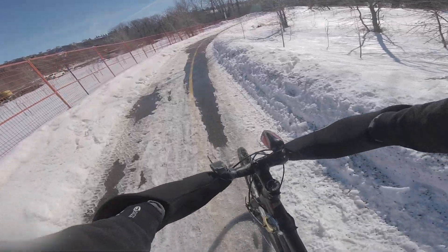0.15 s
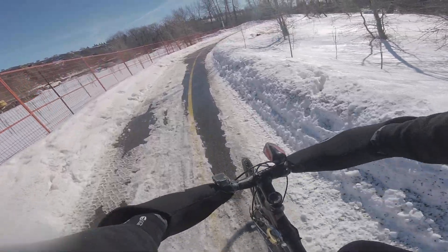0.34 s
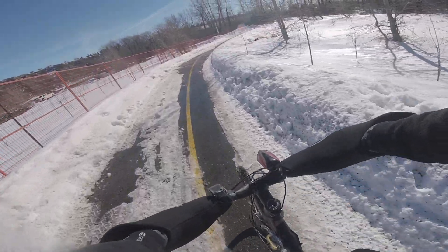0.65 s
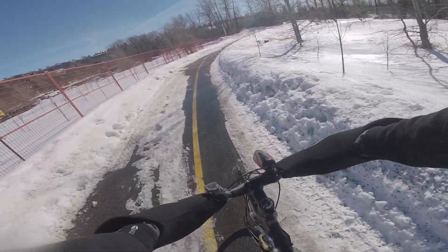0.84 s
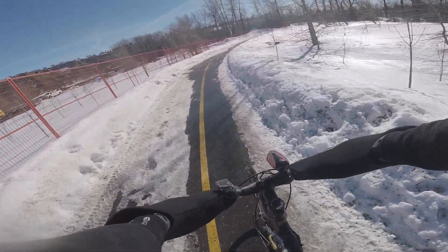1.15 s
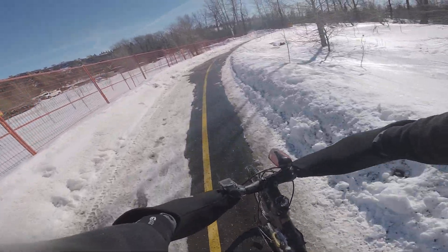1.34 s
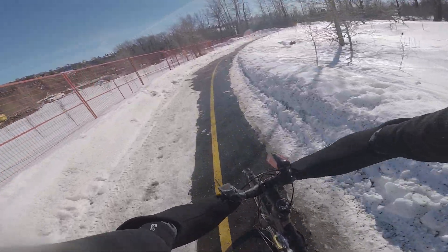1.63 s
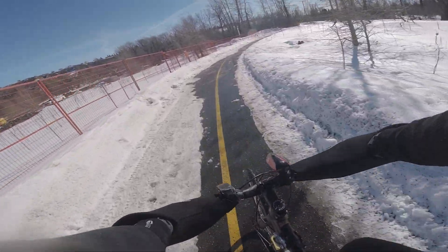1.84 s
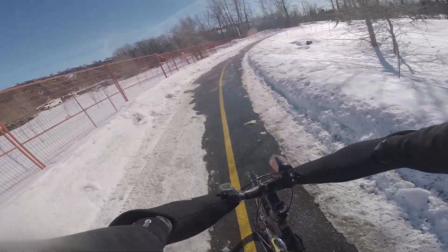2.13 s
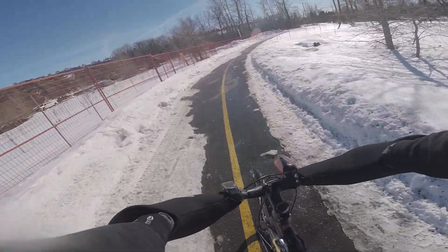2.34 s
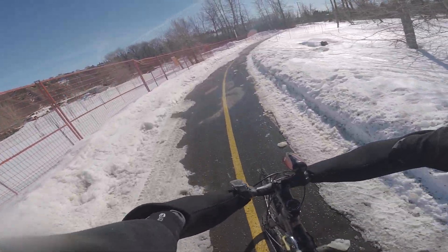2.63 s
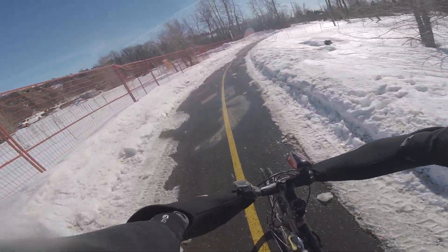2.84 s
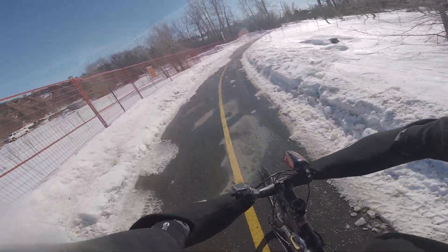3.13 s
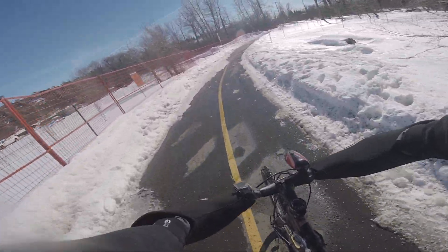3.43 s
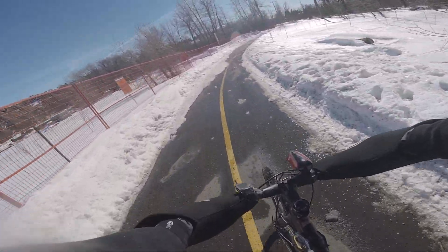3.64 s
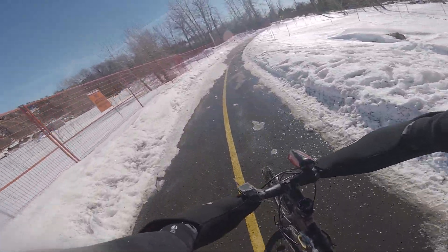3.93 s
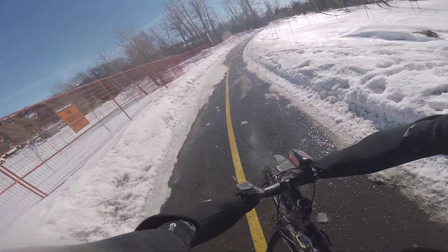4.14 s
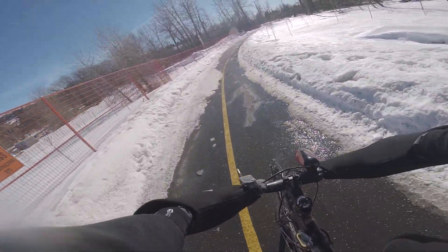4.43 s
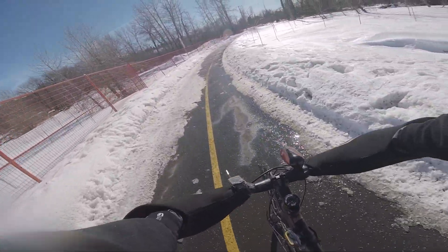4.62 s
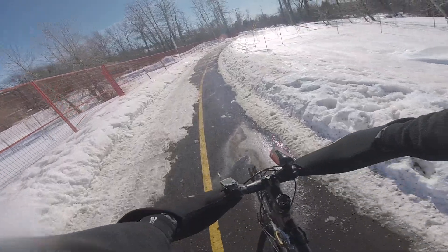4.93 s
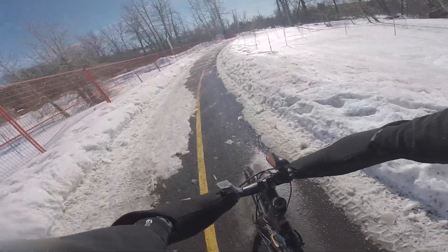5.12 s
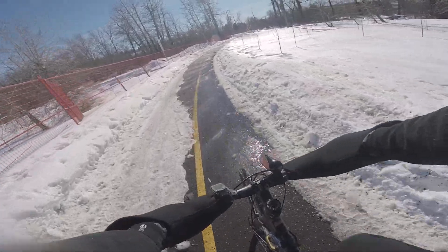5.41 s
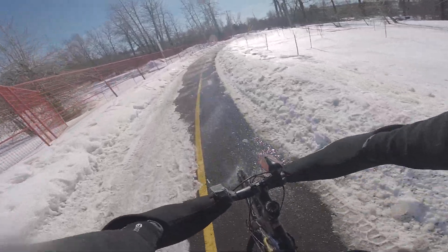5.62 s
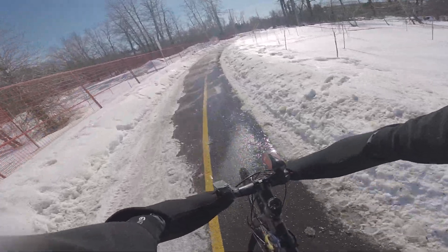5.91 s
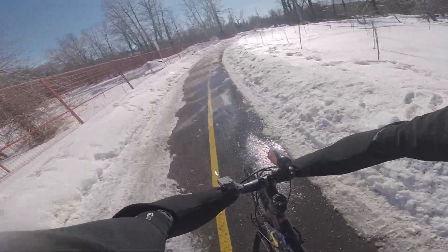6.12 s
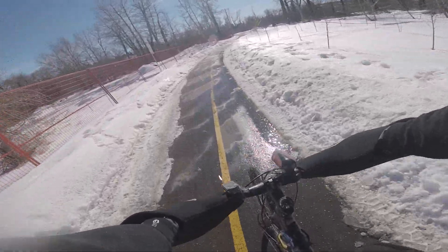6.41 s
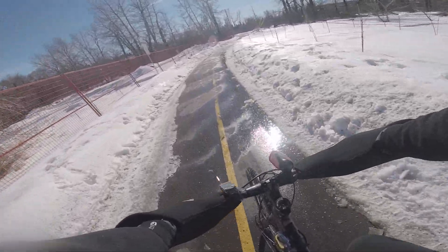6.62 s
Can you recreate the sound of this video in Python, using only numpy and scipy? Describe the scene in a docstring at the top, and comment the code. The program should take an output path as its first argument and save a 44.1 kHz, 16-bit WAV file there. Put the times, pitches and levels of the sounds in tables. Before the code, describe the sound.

A bicycle ride outdoors, mono, very close and dry, from a microphone on the rider's chest. From 0 to 0.45 s the tyres grind over thin snow and grit with deep, wobbling rumble, small crackles and a light knock near 0.25 s. From 0.5 to 1.05 s the crunch grows dense and brittle, crystals crumbling in clumps, with sharp snaps around 0.7 s and heavy low thumps. It then stops abruptly, leaving a quieter, steady roll on wet asphalt: low tyre hum, fine grit crackle, rapid fizzing droplets. Irregular ticks and clicks of ice and stone follow, clearer at 1.8, 4.2 and 4.8 s, while the rumble almost vanishes around 4 s. At 5.4 to 5.5 s ice cracks sharply and the frame gives a loud, short hollow knock. Another knock and quick swish come at 5.7 s, a softer watery swish at 6.1 s, then gritty rolling and renewed rumble until 6.8 s.

```python
"""Packed snow crunches under a bicycle over a low rumble; then the tyres roll on wet, gritty asphalt.
Crumbling crystals make the snow, the humming tyre casing and fine grit the roll, flicked drops the fizz.
Chips of ice and stones tick as sharp blows, and parted puddles swish as swelling noise. Near the end a
plate of ice breaks in a burst of fractures and the frame rings with hard knocks.
The rumble is noise shaped like the shaking of a camera on the rider's chest, from bumps and moving air."""
import sys
import numpy as np
from scipy import signal
from scipy.io import wavfile
from scipy.ndimage import uniform_filter1d

SR = 44100
rng = np.random.default_rng(int(sys.argv[2]) if len(sys.argv) > 2 else 0)


def digitize_waveform(pressure):
    """Quantize a signal to 16-bit integers and store it at the path in sys.argv[1].

    Rows of a 2-D input are taken as channels; values are limited to [-1, 1].
    """
    field = np.atleast_2d(pressure).T
    bounded = np.clip(field, -1, 1)
    quanta = np.round(bounded * 32767).astype(np.int16)
    wavfile.write(sys.argv[1], SR, quanta)


N = 298116
TIME = np.arange(N) / SR

# How bare the asphalt under the tyres is. Each row: time in seconds, share from 0 to 1.
BARE_ASPHALT = [(0, 0.31), (.95, 0.83), (1.05, 1)]
# Tone colours of the three voices of a blow: dull thud of the tyre, crack of ice, bright tick.
# Each row: frequency in Hz, relative level in dB per Hz.
THUD_COLOUR = [(60, -22.5), (170, -1.5), (380, 1.5), (650, -2.5), (1000, -1), (2000, -19), (6000, -75)]
CRACK_COLOUR = [(200, -20.5), (700, -10), (1200, 9), (2300, 7), (3200, -1.5), (4500, -20), (8000, -35),
                (15000, -54)]
TICK_COLOUR = [(800, -59), (2500, -20), (4200, -11.5), (5000, -0.5), (5600, 1), (6400, -4.5), (7500, -13),
               (8800, -18.5), (10300, -25), (11800, -41), (15000, -44)]


def gain_of(db):
    """Turns decibels into amplitude."""
    return 10 ** (np.asarray(db) / 20)


def evened(x):
    """Scales a sound to an average strength (rms) of one."""
    return x / np.sqrt(np.mean(x ** 2) + 1e-20)


def follow(rows):
    """Draws straight lines between the rows of a curve, to give its value at every sample."""
    rows = np.asarray(rows)
    return np.interp(TIME, rows[:, 0], rows[:, 1])


def add(mix, s, sound):
    """Mixes a sound in at a time in seconds."""
    part = mix[max(round(s * SR), 0):][:len(sound)]
    part += sound[:len(part)]


def response(points, size=2048):
    """The ring after one click that has the given spectrum; it starts at once and has unit energy."""
    hz, db = np.transpose(points)
    bins = abs(np.fft.fftfreq(size, 1 / SR))
    log_gain = np.log(gain_of(np.interp(np.log(bins + 1), np.log(hz), db)))
    # the Hilbert transform supplies the phase that packs the energy at the start
    spectrum = np.exp(np.conj(signal.hilbert(log_gain)))
    taps = np.fft.ifft(spectrum).real[:size // 2]
    return taps / np.linalg.norm(taps)


def colour(x, points, size=2048):
    """Filters a signal so that it takes on a spectrum."""
    return signal.oaconvolve(x, response(points, size=size))[:N]


def drift(per_s):
    """A random curve of rms one that takes a new direction so many times a second."""
    steps = rng.standard_normal(int(per_s * TIME[-1]) + 2)
    return evened(np.interp(TIME * per_s, np.arange(len(steps)), steps))


def swell(middle_s, half_s):
    """A smooth rise and fall around a moment."""
    return np.exp(-((TIME - middle_s) / half_s) ** 2)


def grains(per_s, spread_db, most=4):
    """Tiny impacts at random moments, many small and a few large; `most` caps the largest."""
    when, size, side = rng.random((int(per_s * N / SR), 3)).T
    loudness = np.minimum(-np.log(1 - size), most)
    impacts = np.sign(side - .5) * gain_of(spread_db * loudness)
    return evened(np.bincount((when * N).astype(int), impacts, N))


def pitched_grains(per_s, spread_db, most, count=13, patchy_db=1):
    """Grains that ring briefly, each in its own pitch band; the high bands hold the most grains."""
    edges = np.geomspace(200, 16000, count + 1)
    out = np.zeros(N)
    for low, high in zip(edges, edges[1:]):
        rate = per_s * (low / 2000) ** .6
        band_filter = signal.butter(2, [low, high], "band", fs=SR, output="sos")
        band = signal.sosfilt(band_filter, grains(rate, spread_db, most))
        out += band * gain_of(patchy_db * drift(110))  # grains of one size break in clumps
    return evened(out)


def knobs(spread_db, late_s):
    """One click of chance size for each tread knob that leaves the wet ground, slightly off the beat."""
    # The pace of the tread. Each row: time in seconds, knobs per second.
    knob_rates = [(0, 119), (1.4, 108), (2.3, 108), (3.2, 94), (3.8, 103), (4.5, 121), (5.1, 127),
                  (6.1, 122), (6.76, 143)]
    passing = np.flatnonzero(np.diff(np.floor(np.cumsum(follow(knob_rates)) / SR)))
    late, size = rng.standard_normal((len(passing), 2)).T
    moments = passing + np.round(late * late_s * SR).astype(int)
    out = np.zeros(N)
    out[np.clip(moments, 0, N - 1)] = gain_of(spread_db * np.minimum(size, 2))
    return evened(out)


def tyres():
    """The casing drums, the tread grinds fine grit, and each knob flicks a drop over the fizz of spray."""
    # Tone colours. Each row: frequency in Hz, relative level in dB per Hz.
    roar_colour = [(60, -25), (110, -23.5), (146, 0.5), (270, -4.5), (380, 0.5), (500, -6.5), (650, -9.5),
                   (850, -17), (1500, -25), (4000, -44)]
    grit_colour = [(300, -17), (700, 3), (1000, 3.5), (1500, 3), (2200, 2.5), (2700, 0.5), (3200, -6),
                   (4200, -6), (7000, -16.5), (15000, -39)]
    spray_colour = [(1500, -44), (3500, -20), (4300, -24), (4950, -0.5), (5550, 0), (6100, -5), (6600, -4),
                    (7500, -10), (9000, -15), (10000, -18), (11500, -29.5), (14500, -35), (16000, -68)]
    drop_colour = [(1500, -46), (3500, -7.5), (4500, -6.5), (5200, 5.5), (5700, 6.5), (6700, -4.5),
                   (7800, -6.5), (9500, -32), (12000, -48)]
    # How much grit lies on the asphalt. Each row: time in seconds, dB over clean asphalt.
    grit_cover = [(0, 4), (.62, 6.5), (.8, 4), (.93, 5), (1.1, 0), (2.0, -1), (2.8, 1), (3.0, 0),
                  (3.5, 1.5), (3.85, -0.5), (4.5, 4), (4.95, 1), (5.35, 2.5), (5.54, 8.5), (5.85, 1.5),
                  (6.1, 5), (6.4, 1.5), (6.76, 2)]
    roar_db, grit_db, water_db = -43.5, -51, -48  # levels on clean asphalt
    roar_per_grit, spray_per_grit = 0.73, 0.39  # dB gained for each dB of grit

    roar = evened(colour(grains(2500, spread_db=0), roar_colour, size=8192))
    stones = pitched_grains(500, spread_db=3, most=3.6) + .4 * grains(200, spread_db=3, most=3)
    grit = evened(colour(stones * gain_of(1.06 * drift(90)), grit_colour))
    fizz = pitched_grains(260, spread_db=3.4, most=3.6) + .35 * rng.standard_normal(N)
    spray = evened(colour(fizz, spray_colour))
    flicks = evened(colour(knobs(spread_db=4.5, late_s=.0004), drop_colour))
    water = evened(spray + .9 * flicks)

    gritty = follow(grit_cover)
    roar *= gain_of(roar_db + roar_per_grit * gritty)
    grit *= gain_of(grit_db + gritty)
    water *= gain_of(water_db + spray_per_grit * gritty)
    return roar + follow(BARE_ASPHALT) * (grit + water)


def snow():
    """Countless crystals crumble in clumps under the tread and coarser ones snap, until the asphalt is bare."""
    # Snow packing under the tread. Each row: time in seconds, level in dB before trim and cover.
    snow_levels = [(0.0, -39.5), (0.2, -39), (0.42, -36.5), (0.52, -29), (0.64, -27.5), (0.77, -30),
                   (0.965, -28.5), (1.1, -48)]
    # Tone colour. Each row: frequency in Hz, relative level in dB per Hz.
    powder_colour = [(100, -16), (230, -6), (400, 13), (750, -0.5), (1500, 4), (2300, 0), (3300, -3.5),
                     (4400, -2), (5600, 5.5), (7000, -6), (8500, -8), (10000, -6.5), (11800, -34),
                     (15000, -31)]
    trim_db, snap, clump_db = -2.5, 0.42, 2.05

    crystals = pitched_grains(420, spread_db=3.6, most=3.6, count=26, patchy_db=2.6)
    crystals *= gain_of(1.7 * drift(100))
    breaking = crystals + snap * grains(300, spread_db=1, most=2.4)
    crush = evened(colour(breaking * gain_of(clump_db * drift(60.23)), powder_colour))
    # less snow where more asphalt is bare, and none after the last row
    cover = np.sqrt(1 - np.clip(follow(BARE_ASPHALT), 0, 1) ** 2) * (TIME < snow_levels[-1][0])
    return crush * cover * gain_of(follow(snow_levels) + trim_db)


def voice_levels(db, bright_db, thud_db, loss):
    """Levels of thud, crack and tick: the brighter the blow, the more tick and the less thud."""
    return [db + thud_db - loss * bright_db, db, db + bright_db]


def crunches():
    """A crust fails in a quick run of sharp fractures and ringing crumbs: thud, crack and tick."""
    # Crusts of snow and plates of ice giving way. Each row: start in seconds, length in seconds,
    # level of the crack in dB, brightness (tick over crack) in dB.
    breaks = [(0.045, 0.02, -39.5, -4.5), (0.131, 0.021, -42, 1.5), (0.164, 0.026, -41, -4.5),
              (0.21, 0.014, -42, 3), (0.253, 0.034, -44, -0.5), (.317, 0.0081, -31, -4),
              (0.475, 0.045, -42, 2), (0.52, .055, -36.5, 4), (0.61, 0.06, -34, 3.5),
              (0.684, 0.044, -36.5, 2.5), (0.743, 0.019, -31.5, -1.5), (1.009, 0.013, -40.5, -2),
              (1.432, 0.025, -41.5, -12.5), (2.288, 0.013, -41, -4), (2.48, 0.019, -44.5, -3),
              (2.601, 0.033, -46, -5), (2.864, .014, -44, -1), (5.098, 0.014, -39.5, -3),
              (5.4283, 0.025, -28.5, 3.5), (5.453, 0.017, -38, -2), (5.624, .0075, -40, 6.5),
              (5.671, 0.014, -36, -11), (5.679, 0.022, -43, -20.5)]
    fade, sharp = 0.64, 0.63
    thud_db, thud_loss = -3, 0.74  # thud over crack, and dB lost for each dB of brightness

    crumbs = pitched_grains(600, spread_db=3.8, most=3.5, count=18, patchy_db=3)
    breaking = (sharp * grains(2500, spread_db=5) + crumbs) * gain_of(0.55 * drift(450))
    out = np.zeros(N)
    for axis, points in enumerate((THUD_COLOUR, CRACK_COLOUR, TICK_COLOUR)):
        voice = response(points)
        for s, length, db, bright_db in breaks:
            levels = voice_levels(db, bright_db, thud_db, thud_loss)
            count = max(round(length * SR), 64)
            envelope = signal.windows.tukey(count, .12) * np.exp(-fade * np.arange(count) / count)
            piece = breaking[max(round(s * SR), 0):][:count] * envelope
            burst = signal.fftconvolve(piece, voice)
            burst *= np.sqrt(count) / (np.linalg.norm(burst) + 1e-9)
            add(out, s, burst * gain_of(levels[axis]))
    return out


def small_chips():
    """Grit flung at chance moments all along the way, as rows of start, level and brightness."""
    per_s = 6
    level_db, level_spread_db, bright_db, bright_spread_db = -47, 2.5, 2, 7.5
    total = int(per_s * TIME[-1])
    when, size, hardness = rng.uniform(-1, 1, (total, 3)).T
    starts = (np.arange(total) + .5 + .5 * when) / per_s
    return np.transpose([starts, level_db + level_spread_db * size,
                         bright_db + bright_spread_db * hardness])


def chips():
    """Each chip is one sharp blow with a brief scatter after it: thud of the tyre, crack of ice, bright tick."""
    # Larger chips of ice and stones that snap or hit the bike. Each row: start in seconds,
    # level of the crack in dB, brightness (tick over crack) in dB.
    large_chips = [(.3188, -36, -15), (.4359, -34, -3), (.6531, -31, 0), (.7126, -25, 3), (.7536, -29, -8),
                   (1.1919, -42, 10.5), (1.4275, -34, -16), (1.4371, -34, -11), (1.6509, -38, 2.5),
                   (1.764, -39, -2), (1.8325, -29.5, -6.5), (2.24, -39, -3), (2.347, -42.5, 4.5),
                   (2.4714, -38.5, -4), (2.56, -42, 2), (2.7455, -33.5, -7), (2.8378, -38, 10.5),
                   (3.1464, -40.5, 1), (3.5839, -46.5, 10.5), (3.928, -45.5, 12), (4.0106, -36.5, 1.5),
                   (4.1086, -50, 13), (4.1705, -31.5, -5), (4.5405, -43.5, 7.5), (4.57, -33.5, -4.5),
                   (4.6738, -37, -12), (4.8188, -31, -6.5), (5.1029, -33, -9), (5.2569, -43, 5),
                   (5.358, -30, -1.5), (5.4384, -26, 4), (5.4525, -31, 6), (5.5165, -35, 4.5),
                   (5.5634, -34.5, -9), (5.6214, -29, -14), (5.9105, -30.5, -1), (6.1651, -31, -22)]
    chip_s = 0.0043  # seconds of steady sound at the given level that hold the energy of the sharp blow
    rattle, rattle_s, pitch_spread = 0.45, 0.0053, 0.023
    thud_db, thud_loss = -5.5, 0.23  # thud over crack, and dB lost for each dB of brightness

    t, out = np.arange(900) / SR, np.zeros(N)
    for s, db, bright_db in [*large_chips, *small_chips()]:
        levels = voice_levels(db, bright_db, thud_db, thud_loss)
        pitch = np.exp(pitch_spread * (2 * rng.random() - 1))  # each chip rings a little higher or lower
        voices = [response(np.multiply(points, [pitch, 1]))
                  for points in (THUD_COLOUR, CRACK_COLOUR, TICK_COLOUR)]
        scatter = rng.standard_normal(len(t)) * np.exp(-t / rattle_s)
        blow = (t == 0) + rattle * scatter / np.linalg.norm(scatter)
        add(out, s, -signal.fftconvolve(blow, gain_of(levels) @ voices) * np.sqrt(chip_s * SR))
    return out


def knocks():
    """The wheel drops off an edge: the frame rings, its low modes swelling last, and loose parts clatter."""
    # Jolts that knock the frame. Each row: start in seconds, level in dB.
    jolts = [(0.2358, -19), (5.4368, -15.5), (5.451, -19), (5.4909, -5.5), (5.6848, -17.5), (6.163, -34)]
    # What the frame rings with. Each row: frequency in Hz, level in dB relative to the jolt,
    # time to fade by 60 dB in seconds.
    frame_modes = [(216, -1.5, 0.055), (390, 6, 0.028), (576, 1.5, 0.021), (807, -18, 0.027),
                   (955, -19, 0.095), (1450, -13, 0.011), (1830, 0.5, 0.0043)]
    # Tone colour of loose parts. Each row: frequency in Hz, relative level in dB per Hz.
    loose_colour = [(150, -17), (500, -3), (1000, 5), (1600, 2), (4000, -28)]
    rise_cycles, clatter_db, clatter_s = 0.83, -27, 0.0068  # clatter level is relative to the jolt

    t, out = np.arange(8000) / SR, np.zeros(N)
    ring = np.zeros(len(t))
    for hz, db, t60 in frame_modes:
        rise = 1 - np.exp(-(hz * t / rise_cycles) ** 2)
        ring += gain_of(db - 60 * t / t60) * np.sin(2 * np.pi * hz * t) * rise
    for s, db in jolts:
        noise = colour(rng.standard_normal(len(t)), loose_colour)[:len(t)]
        clatter = evened(noise) * np.exp(-t / clatter_s)
        add(out, s, gain_of(db) * (gain_of(clatter_db) * clatter - ring))
    return out


def swish():
    """A smooth hiss swells and fades as the tyre parts shallow water."""
    # Puddles of slush. Each row: middle in seconds, half length in seconds, level at the peak in dB.
    puddles = [(2.87, .03, -53), (5.69, 0.017, -36), (6.092, 0.073, -42.5)]
    # Tone colour. Each row: frequency in Hz, relative level in dB per Hz.
    film_colour = [(800, -22), (1700, -6), (2350, -0.5), (3200, -14), (5000, -6), (7500, -8.5),
                   (9800, -13.5), (11500, -52), (16000, -52)]
    hiss = evened(colour(rng.standard_normal(N), film_colour))
    return hiss * sum(gain_of(db) * swell(s, half) for s, half, db in puddles)


def rumble():
    """The camera wobbles on the rider's chest, harder on rutted snow and at each bump."""
    # Shaking from the uneven path. Each row: time in seconds, level in dB.
    shake_levels = [(0, -19.5), (.45, -23), (.65, -21), (.9, -25), (1.2, -24.5), (1.45, -31), (1.95, -32),
                    (2.9, -43), (3.7, -48), (4.2, -58.5), (4.9, -44), (5.38, -35.5), (5.8, -25),
                    (6.76, -26.5)]
    # Bumps that heave the camera. Each row: middle in seconds, level at the peak in dB.
    heaves = [(.525, -11.5), (.635, -14), (0.786, -11), (5.105, -28), (5.461, -22), (5.535, -14),
              (6.215, -17)]
    # Tone colour. Each row: frequency in Hz, relative level in dB per Hz.
    rumble_colour = [(8, -18.5), (18, -8.5), (26, 0), (42, -9.5), (62, -17), (100, -27), (160, -37),
                     (400, -93)]
    bump_s, steady = 0.028, 0.75  # steady: 0 leaves the chance swells of the noise, 1 irons them out

    wobble = evened(colour(rng.standard_normal(N), rumble_colour, size=32768))
    power = uniform_filter1d(uniform_filter1d(wobble ** 2, size=3000), size=3000)
    wobble = evened(wobble / (power + 1e-6) ** (steady / 2))
    heave = sum(gain_of(db) * swell(s, bump_s) for s, db in heaves)
    return wobble * np.hypot(gain_of(follow(shake_levels)), heave)


def scene():
    """Everything is close and in the open air, with no echo."""
    return (tyres() + snow() + crunches() + chips() + knocks() + swish() + rumble())[None]


def record(dry):
    """The camera passes nothing above its upper band limit."""
    edge_hz = 15250
    lowpass = signal.firwin(511, edge_hz, window=("kaiser", 9), fs=SR)
    return signal.oaconvolve(dry, lowpass[None], "same")


dry = scene()
out = record(dry)
digitize_waveform(out)
```